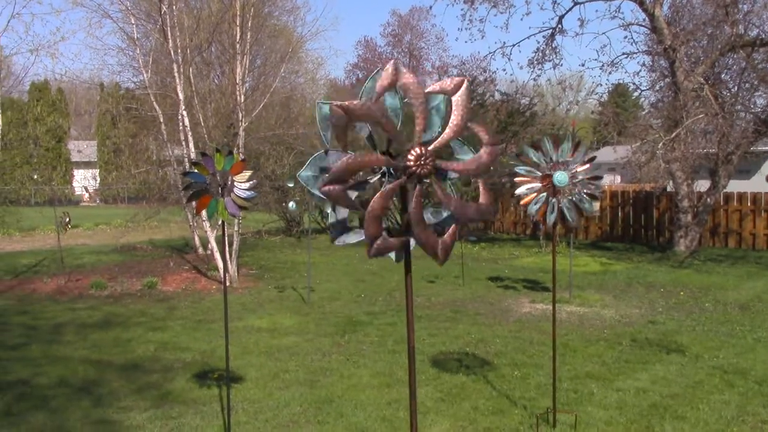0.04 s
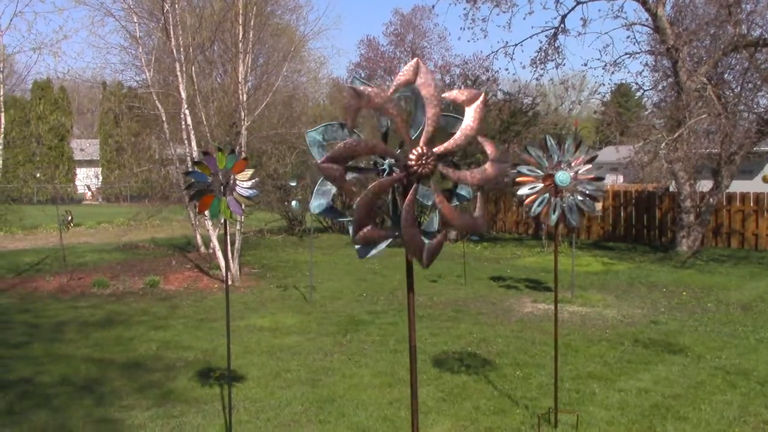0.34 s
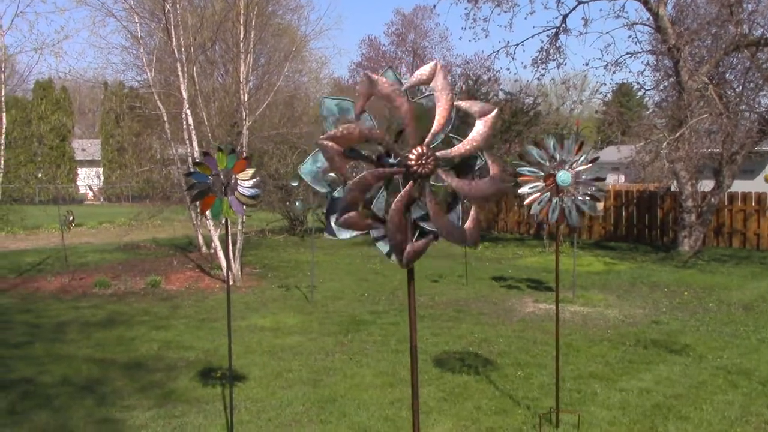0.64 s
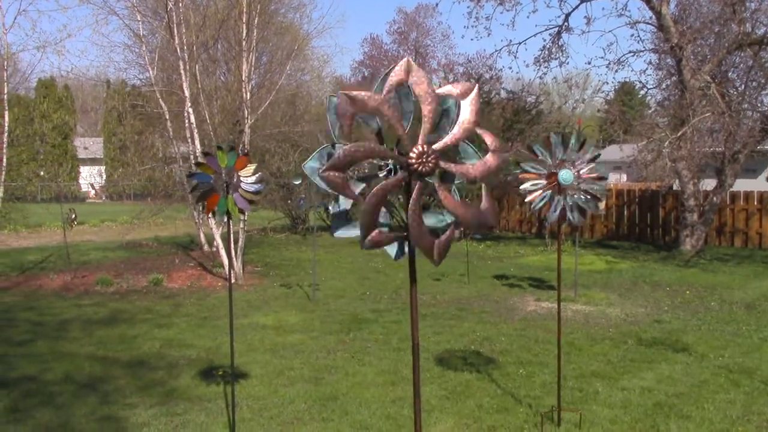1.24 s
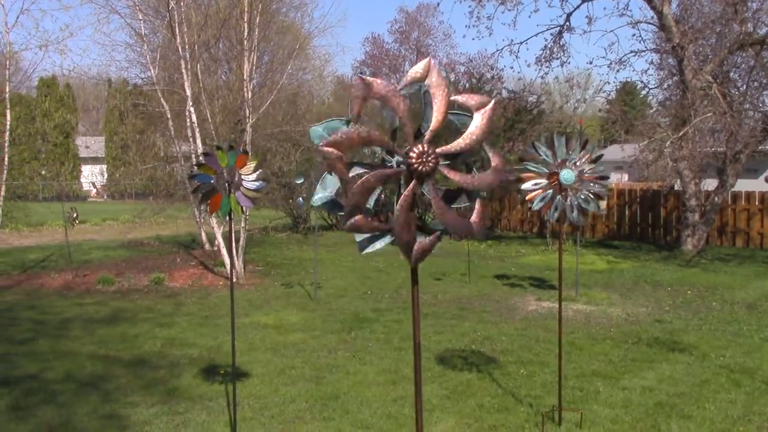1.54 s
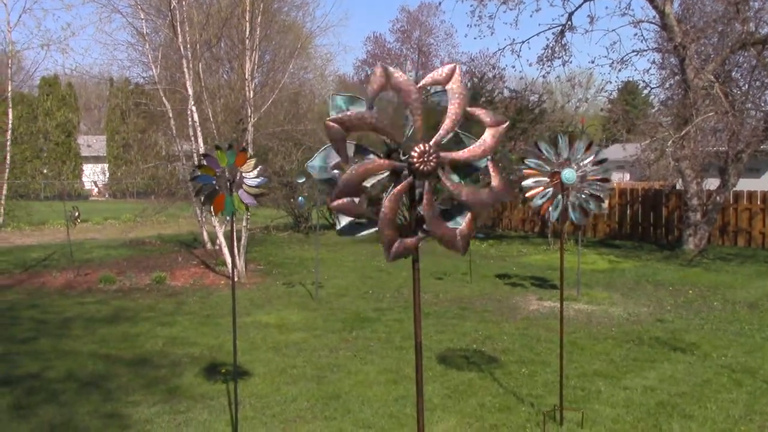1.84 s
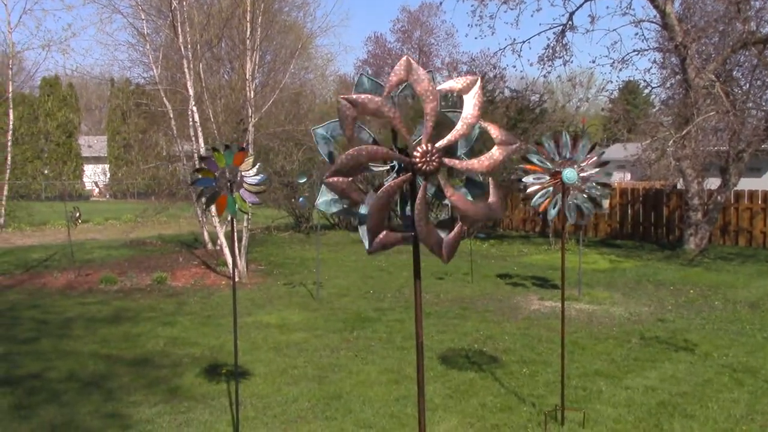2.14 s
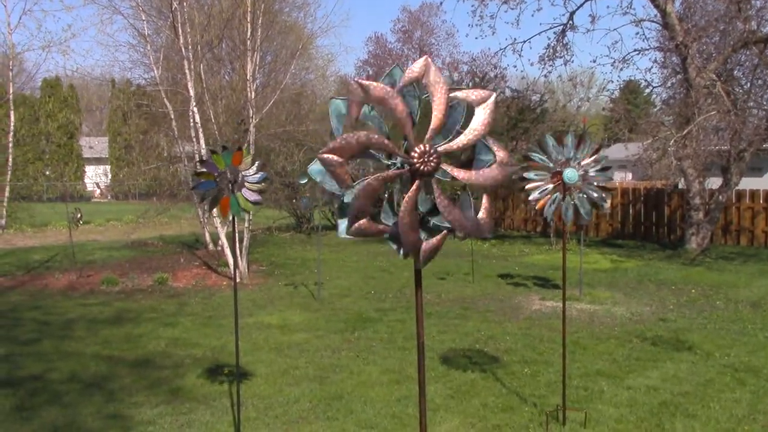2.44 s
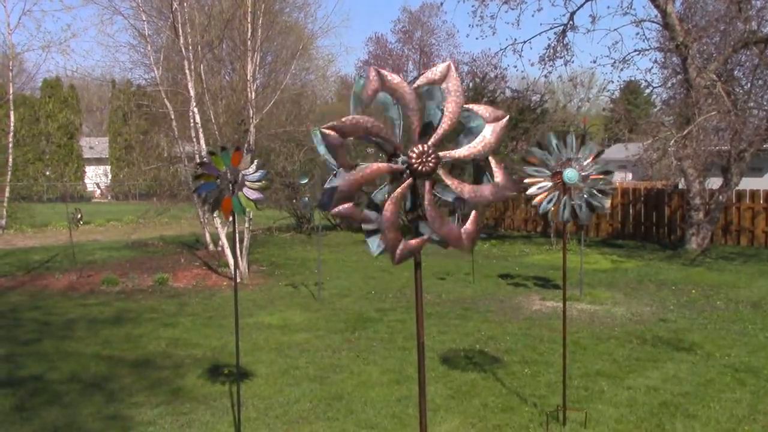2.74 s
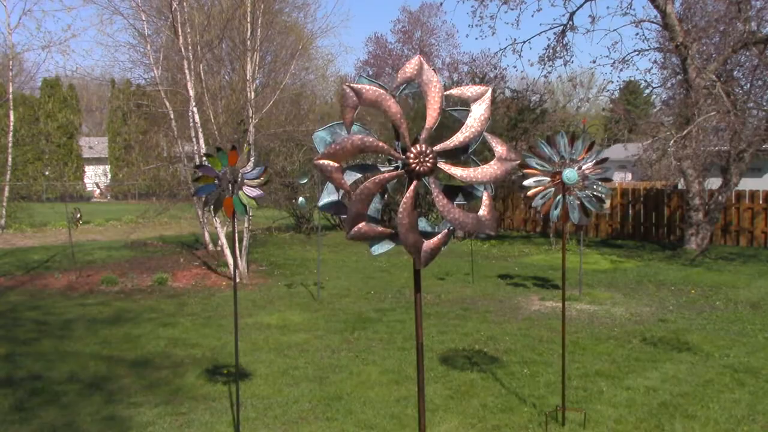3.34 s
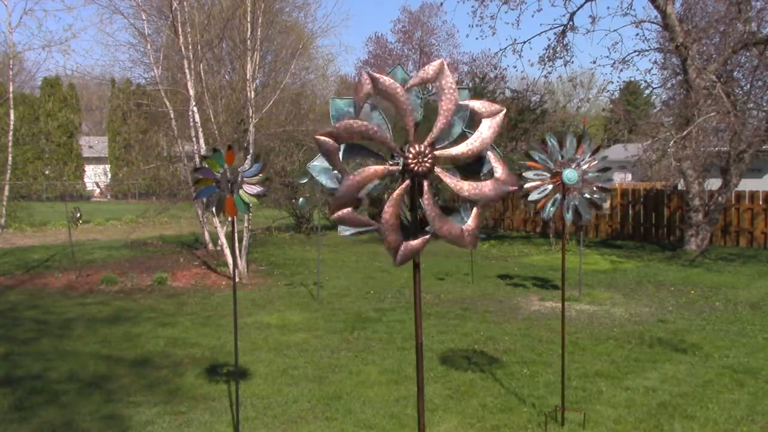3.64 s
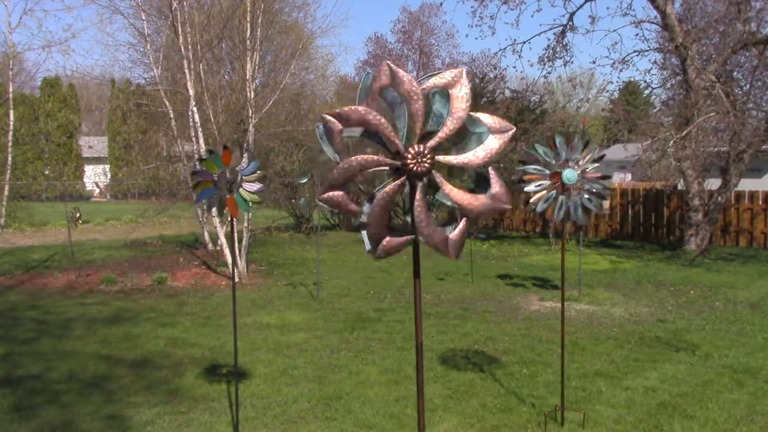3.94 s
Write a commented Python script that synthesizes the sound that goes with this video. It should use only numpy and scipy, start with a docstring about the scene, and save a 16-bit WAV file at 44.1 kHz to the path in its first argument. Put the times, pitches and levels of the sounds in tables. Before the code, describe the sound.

Small birds call in a garden, opening with three sharp chips, then scattered whistles near and far. Wind rumbles on the microphone over distant traffic. A fast, thin trill starts just after 1 second, peaks around 2.5 and ends near 3.3. Around 2 seconds the wind lulls, a bird squawks and chips, and a soft hiss swells. A close tick comes at 3.4, and a gust thumps at 3.8.

```python
"""A back garden on a breezy spring day. It opens on three sharp scolding chips, with gusts rumbling on the
microphone over the hush of distant traffic. Birds whistle farther off; trees, fence and houses scatter
the calls. A small bird starts a fast, thin trill just after 1 s. Around 2 s the wind lulls, the scolder
squawks and chips again, and a soft hiss swells. The trill peaks, then ends under far calls; something
ticks close to the microphone at 3.4 s, and the hardest gust thumps just before the end."""
import sys
import numpy as np
from scipy import signal
from scipy.fft import rfft, irfft
from scipy.io import wavfile
from scipy.ndimage import uniform_filter1d

SR = 44100
rng = np.random.default_rng(int(sys.argv[2]) if len(sys.argv) > 2 else 0)


def transcribe(u):
    """Save the signal u as a 16-bit wav file named by the first command-line argument.

    u: samples, shape (n,) or (channels, n), limited to [-1, 1]; the rate is SR.
    q: integer samples, one column per channel.
    """
    v = np.clip(np.atleast_2d(u).T, -1, 1)
    q = np.round(v * 32767).astype(np.int16)
    wavfile.write(sys.argv[1], SR, q)


N = 176400
TIME = np.arange(N) / SR


# Sharp scolding chips: (time [s], top pitch [Hz], end pitch [Hz], level at the knee [dB])
SCOLD_CHIPS = [(.008,5150,2650,-31.5),(.069,5350,2750,-29),(.140,4900,2400,-30.5),(2.081,5100,2600,-32)]
# Harsh squawks: (time [s], length [s], start pitch [Hz], middle pitch [Hz], end pitch [Hz], level [dB])
SCOLD_SQUAWKS = [(1.892,.04,3200,3500,3200,-40),(1.9,.05,4200,4100,4300,-49),(1.926,.016,3100,2950,2750,-35),(1.94,.034,2700,3350,3850,-27),(1.96,.03,3900,4400,4200,-40),(2.016,.009,3000,3200,3200,-37)]

def scolding_bird():
    """Chips flick up, crest and drop, drawn out into a rasp by their echoes; the squawk grates upward."""
    start_hz, sag_hz, knee_hz = 3000, 764, 3300
    corners_s = np.cumsum([0, .007, .00418, .00307, .00924])  # rise, crest, fall to the knee, tail
    t = TIME[TIME < corners_s[-1]]
    shape_db = np.interp(t, corners_s, [0, -9.5, -9.5, 0, -4])
    chips = np.zeros(N)
    for s, top_hz, end_hz, db in SCOLD_CHIPS:
        hz = np.interp(t, corners_s, [start_hz, top_hz, top_hz - sag_hz, knee_hz, end_hz])
        add(chips, s, from_db(db + shape_db) * tone(hz, rough=.074, taper=.068))
    squawks = slurs(SCOLD_SQUAWKS, rough=.064, taper=.52)
    echo_send = from_db(1.5) * chips + from_db(-6.5) * squawks
    return chips + squawks + garden_echoes(echo_send, spread_s=.036, trees_db=-10.5)


# The trill's swell: (time [s], level [dB])
TRILL_SWELL = [(1.15,-65),(1.55,-58),(1.9,-57),(2.2,-50),(2.48,-43.5),(2.68,-48),(2.88,-50.5),(3.08,-47),(3.27,-46)]
# The floor each note falls back to: (time [s], pitch [Hz])
TRILL_FLOOR = [(1.15,4450),(2.48,4470),(2.9,4400),(3.27,4200)]

def trilling_bird():
    """A fast run of thin notes: each sweeps up, breaks and falls back, and the pace slowly slackens."""
    start_s, period_s, slowing_s = 1.148, .0944, .00018
    up_s, up_span_hz, up_bend_s = .024, 3800, .0105
    down_s, down_span_hz, down_bend_s = .033, 1760, .006
    break_s, uneven_db = .003, 1.8
    up, down = TIME[TIME < up_s], TIME[TIME < down_s]
    notes = np.zeros(N)
    for k in range(23):
        s = start_s + period_s * k + slowing_s * k * (k - 1) / 2
        floor_hz = curve(TRILL_FLOOR, s)
        gain = from_db(curve(TRILL_SWELL, s) + uneven_db * rng.standard_normal())
        rise = tone(floor_hz + up_span_hz * np.exp((up - up_s) / up_bend_s), rough=.004, taper=.49)
        fall = tone(floor_hz + down_span_hz * np.exp(-down / down_bend_s), rough=.0033, taper=.19)
        add(notes, s - up_s, gain * from_db(-4.5) * rise * np.sqrt(up / up_s))
        add(notes, s + break_s, gain * fall * (1 - down / down_s))
    return notes + from_db(-8) * garden_echoes(notes, spread_s=.022, trees_db=-2)


# Clear slurs: (time [s], length [s], start pitch [Hz], middle pitch [Hz], end pitch [Hz], level [dB])
NEAR_WHISTLES = [(.328,0.054,1905,2037,2100,-44.5),(.39,.045,2980,3240,3300,-40.5),(.72,0.063,3100,3274,3450,-44),(.83,0.024,3760,3440,3220,-50.5),(.86,.035,2630,2650,2600,-48.5),(.98,0.065,2390,2390,2330,-52),(1.065,0.048,2920,3200,3350,-40.5),(1.176,0.089,2794,3520,3505,-37),(1.482,0.032,3130,2930,2640,-46.5),(1.48,0.03,4200,4140,4050,-56),(1.54,0.022,3260,3050,2780,-48),(1.625,0.015,2800,2870,2950,-44),(1.672,0.034,3400,2920,2730,-44.5),(1.675,.035,4080,4080,3960,-54),(1.71,0.035,3540,3080,2840,-42),(1.825,0.04,2140,2050,1950,-49),(1.87,0.21,1950,1850,1710,-51.5),(3.685,0.05,3300,3110,3100,-50.5)]
# One very thin falling whistle, same columns
HIGH_WHISTLE = [(3.01,.29,8600,8100,6500,-71)]
# Burry calls in the distance, same columns
FAR_WHISTLES = [(.275,.035,4520,4600,4670,-50),(.33,0.058,4500,4570,4640,-51.5),(.29,0.041,3500,3150,2660,-47),(.35,0.057,2900,3050,2680,-44),(.41,0.085,3200,3150,3000,-44),(.49,0.047,3000,2700,2390,-50),(.54,0.13,3700,3800,3670,-52),(.62,0.11,3300,3150,3340,-51.5),(1.15,.13,3270,3580,3474,-49.5),(1.53,0.097,2400,2300,2340,-49.5),(2.32,0.072,3090,3000,3000,-45),(2.595,0.147,3150,3220,3170,-48.5),(2.75,0.092,3300,3150,3170,-51.5),(2.76,0.3,4200,4100,4270,-58),(2.85,.15,3830,3660,3360,-49),(2.95,.185,3337,3045,2880,-39),(3.67,0.021,4450,4300,4100,-55),(3.73,0.047,3150,3120,3100,-71),(3.94,0.1,4400,4350,4000,-57)]

def whistling_birds():
    """Nearer whistles keep their line; far, burry ones arrive fully wet, smeared by the garden."""
    near = slurs(NEAR_WHISTLES, rough=.0044, taper=.83) + slurs(HIGH_WHISTLE, rough=.0067, taper=.6)
    far = slurs(FAR_WHISTLES, rough=.028, taper=.36, burr=.05)
    near_wet = from_db(-7.5) * garden_echoes(near, spread_s=.03, trees_db=-4)
    far_wet = garden_echoes(far, spread_s=.026, trees_db=-10.5)
    return near + near_wet + far_wet


# Gust envelopes for the deep rumble and the upper-bass buffeting: (time [s], relative level [dB])
RUMBLE_GUSTS = [(0,-16.5),(.1,-23.5),(.35,-16),(.52,-17.5),(1.12,-18),(1.22,-25.5),(1.47,-26),(1.58,-34.5),(1.7,-31),(1.77,-23),(1.9,-34),(2.02,-42.5),(2.2,-44),(2.48,-38.5),(2.56,-27.5),(2.72,-28),(2.8,-33),(2.97,-27.5),(3.12,-36),(3.22,-23),(3.29,-37.5),(3.38,-26),(3.68,-24.5),(3.77,-8.5),(3.85,-36.5),(3.92,-22.5),(4,-16.5)]
BUFFET_GUSTS = [(0,-31),(.33,-28.5),(.43,-42.5),(.51,-21),(.72,-27.5),(.96,-27),(1.1,-44.5),(1.6,-46.5),(1.78,-45),(1.95,-58),(2.45,-63),(2.6,-37.5),(2.78,-59),(3.13,-43.5),(3.22,-33.5),(3.3,-48),(3.62,-34),(3.77,-33.5),(3.86,-42),(3.92,-30),(4,-52)]
# Their tone colours: (frequency [Hz], spectral level [dB])
RUMBLE_EQ = [(10,-35.5),(22,8),(45,-3),(60,-4),(85,-26),(125,-35),(200,-59),(400,-86)]
BUFFET_EQ = [(35,-23),(62,-1.5),(85,4),(120,-9),(160,-22),(220,-33),(320,-45),(600,-48),(1500,-84)]

def wind():
    """Eddies on the microphone: a deep rumble with buffeting on top; the biggest pushes are rounded."""
    rumble = from_db(7.5 + curve(RUMBLE_GUSTS, TIME)) * steadied(noise(RUMBLE_EQ), samples=1800)
    buffet = from_db(8 + curve(BUFFET_GUSTS, TIME)) * steadied(noise(BUFFET_EQ), samples=1600)
    ceiling = .75
    return ceiling * np.tanh((rumble + buffet) / ceiling)


# Close, dry ticks: (time [s], relative level [dB])
TICK_HITS = [(0.263,-45),(2.58,-44),(3.403,-50),(3.41,-34),(3.4234,-25)]
# The ring of a tick: (frequency [Hz], relative level [dB], time to fade 60 dB [s])
TICK_RING = [(1300,-9,.01),(2400,-4,.01),(3100,-2,.014),(3900,-6,.01),(5300,-11,.005)]

def ticks():
    """Tiny hard contacts by the microphone: a snap and a few short modes."""
    out, t = np.zeros(N), TIME[:SR // 20]
    ring = sum(from_db(db - 60 * t / t60) * np.sin(2 * np.pi * hz * t) for hz, db, t60 in TICK_RING)
    snap = from_db(4.5) * (t == 0)
    for s, db in TICK_HITS:
        add(out, s, from_db(db) * (.5 * ring + snap))
    return out


# The hiss swells and fades: (time [s], level [dB])
HISS_SWELL = [(0,-64.5),(1.3,-71),(1.8,-58),(2.0,-57.5),(2.2,-51.5),(2.45,-62),(2.8,-63),(4,-74)]
# Its bright colour: (frequency [Hz], spectral level [dB])
HISS_EQ = [(800,-24),(2000,-1),(3200,3),(5000,1),(6500,-14.5),(9000,-21),(15000,-29)]

def hiss():
    """A soft, diffuse treble swell behind the birds, likely the scolding calls echoing off the trees."""
    return from_db(curve(HISS_SWELL, TIME)) * noise(HISS_EQ)


# The traffic bed, almost flat: (time [s], level [dB])
TRAFFIC_BED = [(0,-39.5),(1,-40),(2,-40),(3,-40.5),(4,-41)]
# Its dull colour: (frequency [Hz], spectral level [dB])
TRAFFIC_EQ = [(40,0.5),(110,6.5),(170,0),(300,-2),(600,-0.5),(800,-.5),(970,1.5),(1130,-7.5),(1450,-13),(2300,-16.5),(3200,-16),(4200,-27),(5500,-33),(7500,-35),(15000,-38.5)]

def traffic():
    """Steady far tyre noise and the hush of the air."""
    return from_db(curve(TRAFFIC_BED, TIME)) * noise(TRAFFIC_EQ)


def garden_echoes(x, spread_s, trees_db):
    """A dense cluster of reflections off fence and walls, and a long tail from the far trees."""
    t, predelay_s, trees_t60_s = TIME[:SR], .0035, .84
    cluster = np.exp(-(t / spread_s) ** 4)
    tail = from_db(trees_db - 60 * t / trees_t60_s)
    response = (cluster + tail) * (t > predelay_s) * rng.standard_normal(SR)
    return signal.fftconvolve(x, response / np.linalg.norm(response))[:N]


def slurs(rows, rough, taper, burr=0, burr_hz=130):
    """Notes that each bend smoothly through three pitches; a burr is a fast, uneven vibrato."""
    out = np.zeros(N)
    for s, length, start, middle, end, db in rows:
        bend = np.polyfit([0, .5, 1], [start, middle, end], 2)
        hz = np.polyval(bend, np.linspace(0, 1, int(length * SR)))
        vibrato = tone(np.full(len(hz), burr_hz), rough=1, taper=0)
        add(out, s, from_db(db) * tone(hz * (1 + burr * vibrato), rough, taper))
    return out


def tone(hz, rough, taper):
    """A bird's near-sine on a pitch path; rough is the flutter depth, taper the share spent in fades."""
    flutter = rms_one(uniform_filter1d(rng.standard_normal(len(hz)), size=40))
    phase = 2 * np.pi * np.cumsum(hz * (1 + rough * flutter)) / SR
    return np.sin(phase) * signal.windows.tukey(len(hz), taper)


def noise(eq):
    """Noise of rms 1 with the given spectrum."""
    hz, db = np.transpose(eq)
    bins = np.maximum(np.fft.rfftfreq(N, 1 / SR), 1)
    gains = from_db(np.interp(np.log(bins), np.log(hz), db))
    return rms_one(irfft(rfft(rng.standard_normal(N)) * gains, N))


def steadied(x, samples):
    """Even out the slow chance swings of a noise."""
    power = uniform_filter1d(uniform_filter1d(x * x, samples), samples)
    return x / np.sqrt(power)


def from_db(db):
    """Decibels to gain."""
    return 10 ** (np.asarray(db) / 20)


def rms_one(x):
    """Scale to rms 1."""
    return x / np.sqrt(np.mean(x ** 2) + 1e-20)


def curve(rows, at):
    """Straight lines through (x, value) rows."""
    return np.interp(at, *np.transpose(rows))


def add(out, s, x):
    """Mix x in at time s."""
    i = int(np.clip(s * SR, 0, N))
    out[i:i + len(x)] += x[:N - i]


def scene():
    """The mono mix: birds and ticks over a bed of wind, traffic and hiss."""
    bed = wind() + traffic() + hiss()
    return (bed + scolding_bird() + trilling_bird() + whistling_birds() + ticks())[None]


def record(dry):
    """A steep high cut on the whole mix."""
    stop_hz, stop_db = 16500, 70
    return signal.sosfilt(signal.cheby2(16, stop_db, stop_hz, fs=SR, output="sos"), dry)


dry = scene()
out = record(dry)
transcribe(out)
```